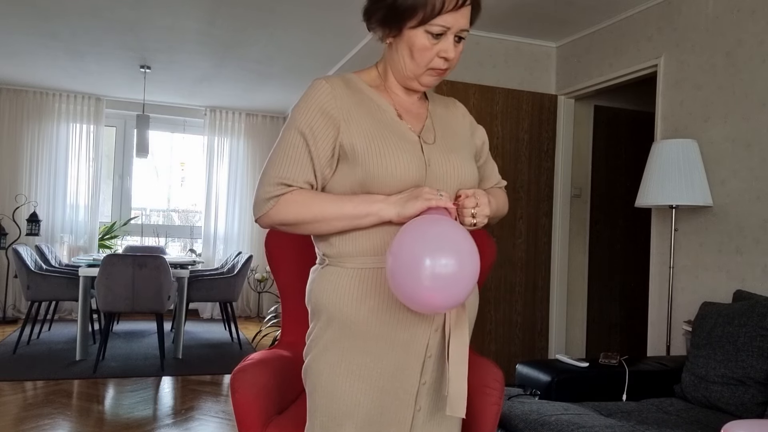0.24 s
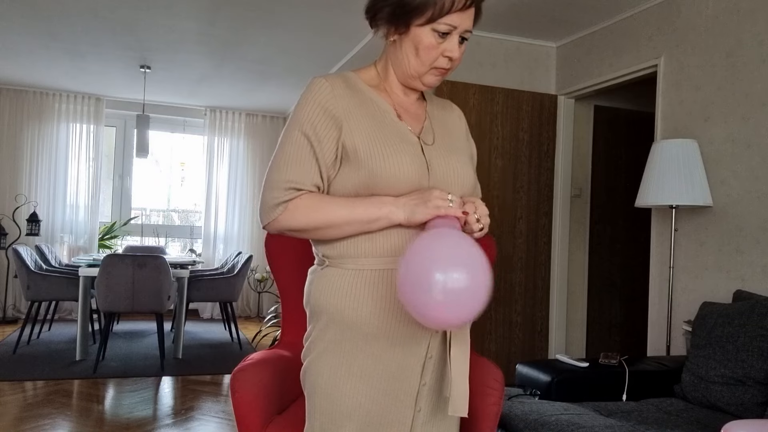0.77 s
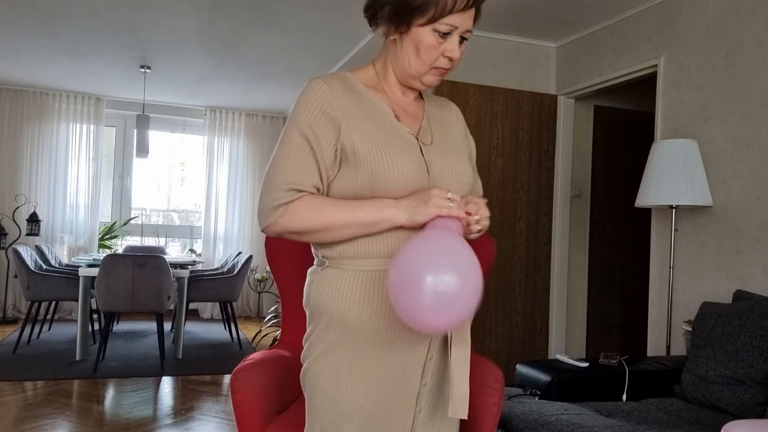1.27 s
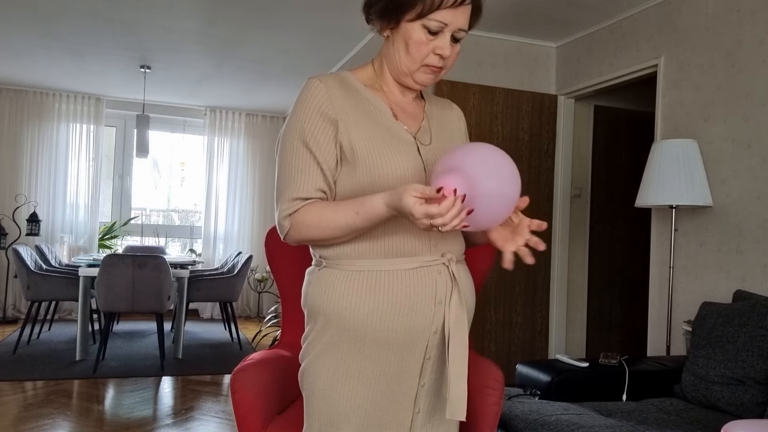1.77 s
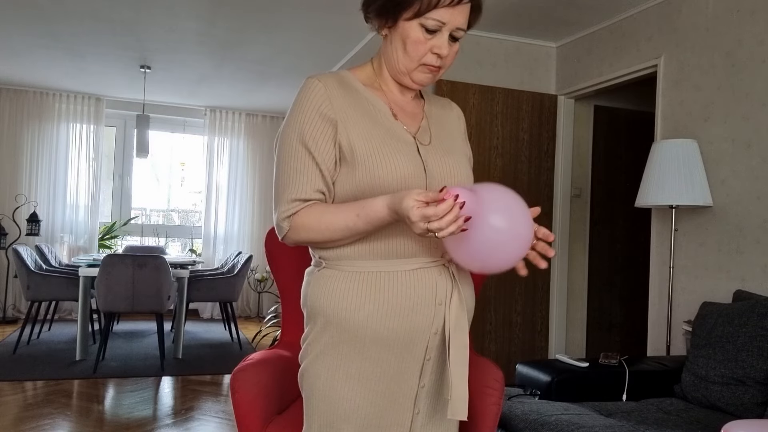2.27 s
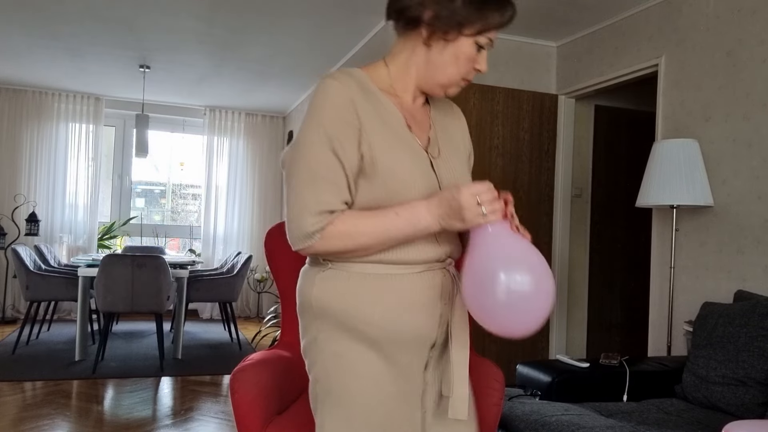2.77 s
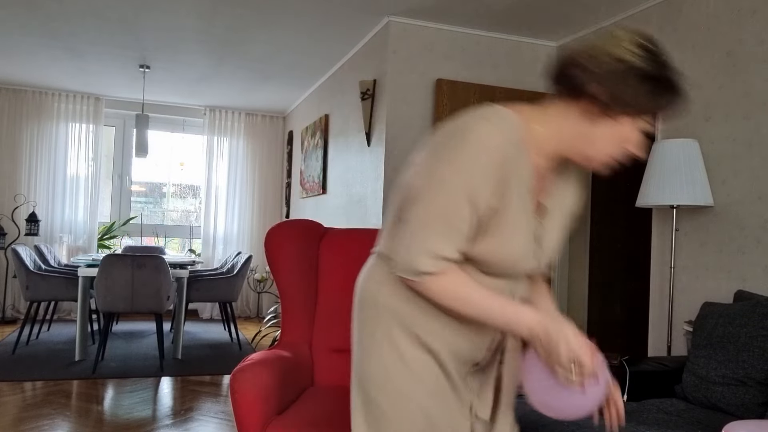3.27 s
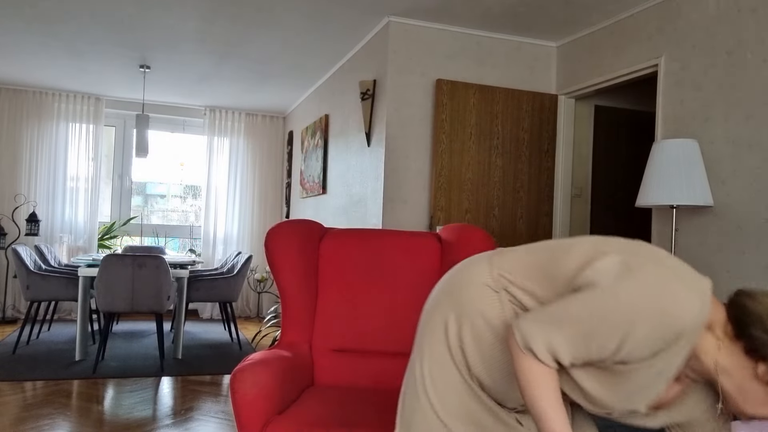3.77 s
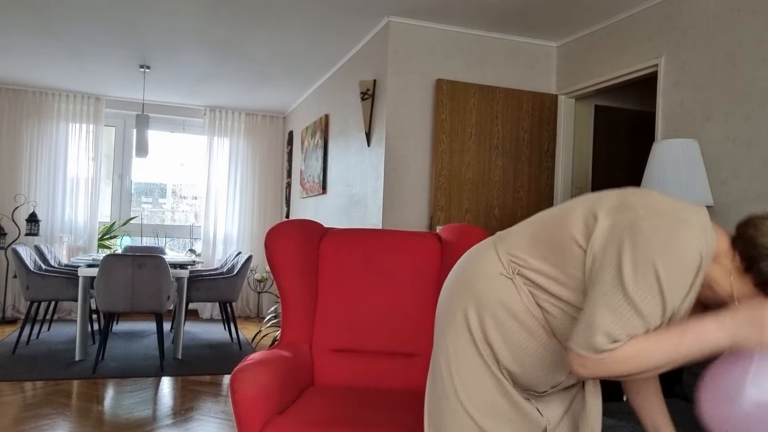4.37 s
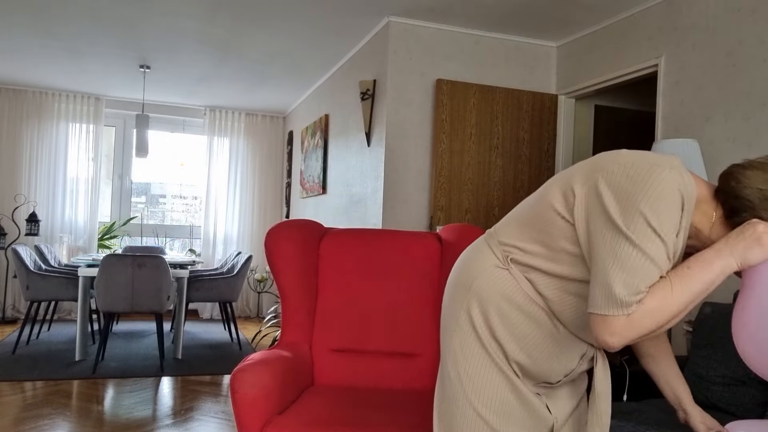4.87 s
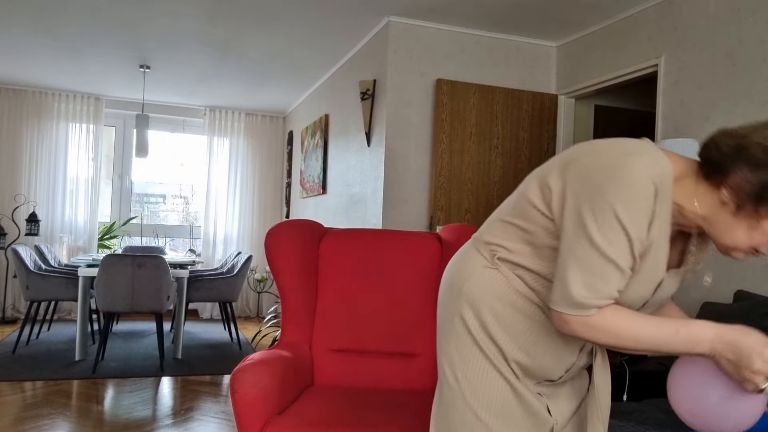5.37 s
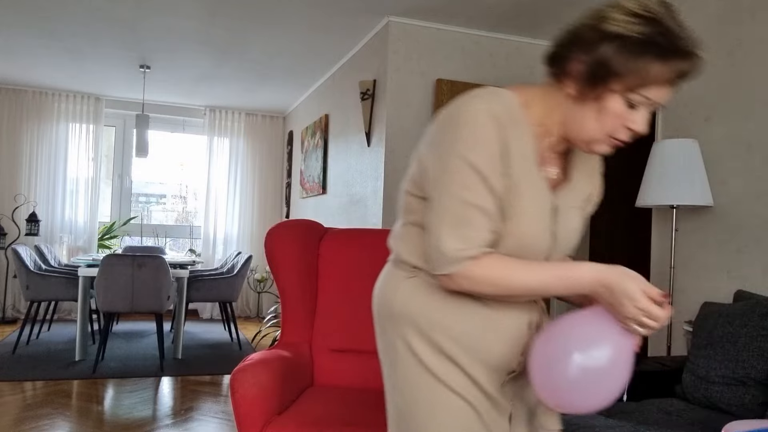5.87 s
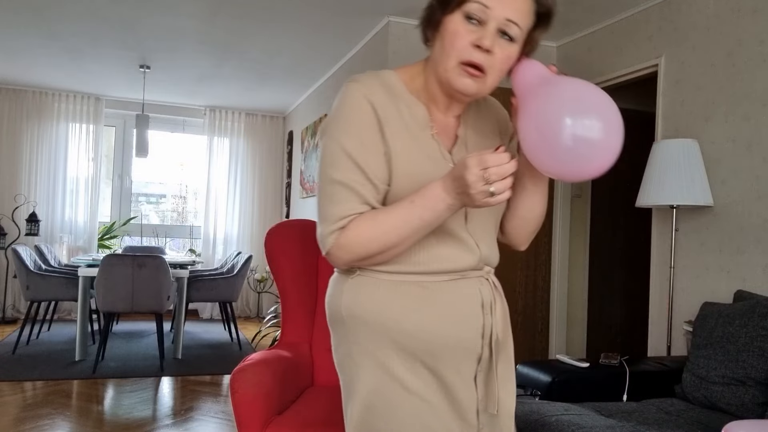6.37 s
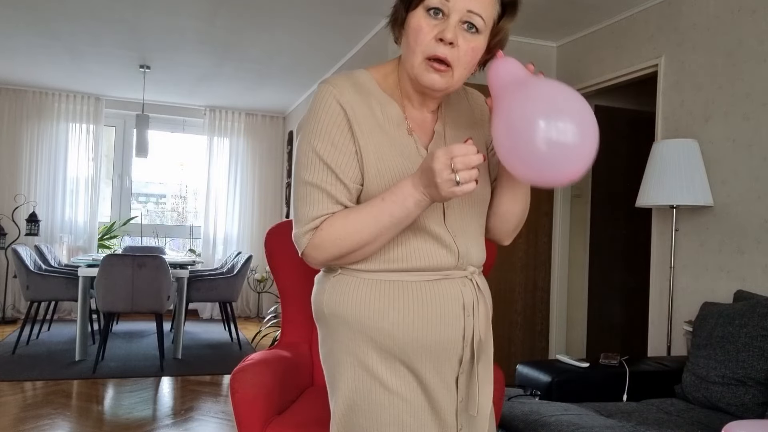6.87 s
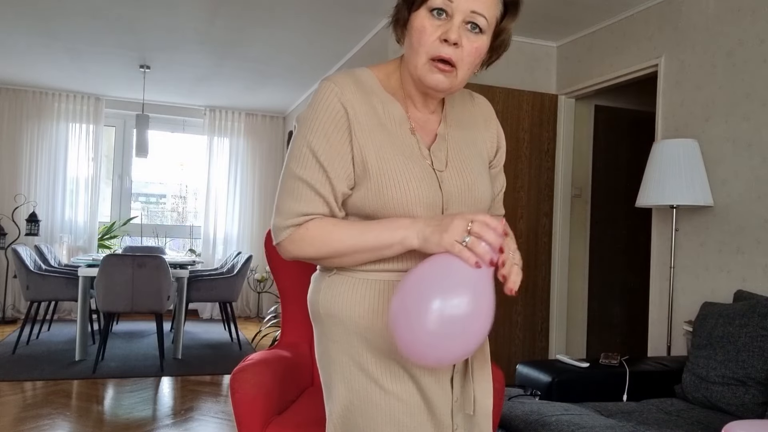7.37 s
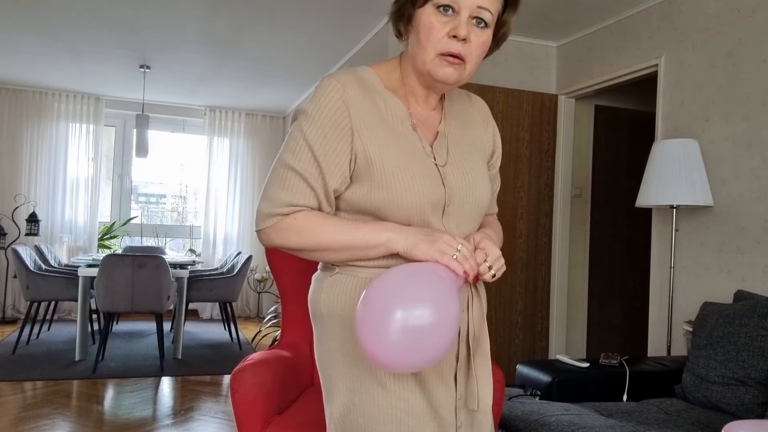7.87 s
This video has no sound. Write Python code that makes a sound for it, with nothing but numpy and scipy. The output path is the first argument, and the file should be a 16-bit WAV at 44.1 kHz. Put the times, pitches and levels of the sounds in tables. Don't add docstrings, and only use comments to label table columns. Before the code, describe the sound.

Indoors, a hand pump pushes air into a balloon about once a second. Each half-second stroke is a bright, turbulent hiss topped by a thin, fluttering, extremely high whistle, ending in a low piston knock. Soft puffs of intake air slide upward between strokes. Fingers tick on rubber, and a brief squeak follows the sixth push. Close stereo microphone, small furnished room, faint background hiss.

```python
import sys
import numpy as np
from scipy import signal
from scipy.fft import rfft, irfft, next_fast_len
from scipy.io import wavfile
from scipy.ndimage import uniform_filter1d, map_coordinates

SR = 44100
rng = np.random.default_rng(int(sys.argv[2]) if len(sys.argv) > 2 else 0)


def voltage_ratio(level):
    return 10 ** (np.asarray(level, float) / 20)


def inscribe(sig):
    pcm = np.round(np.clip(np.atleast_2d(sig).T, -1, 1) * 32767)
    wavfile.write(sys.argv[1], SR, pcm.astype(np.int16))


N = 358533
T = np.arange(N) / SR
SIZE = next_fast_len(N + SR)
HZ = np.maximum(np.arange(SIZE // 2 + 1) * SR / SIZE, 1)

# start_s, length_s, hiss_db, middle_share_db, bright_share_db
PUSHES = [
    (-.1, 0.33, -32, -1, -4.5),
    (0.836, 0.49, -30, -1, -2.5),
    (1.892, 0.47, -28, -1.5, -2.5),
    (2.932, 0.5, -27.5, -3, -1),
    (3.963, 0.47, -27, -1.5, -0.5),
    (5.025, 0.51, -28, -2.5, 1.5),
    (6.081, 0.44, -27.5, -1, 2),
    (7.063, 0.48, -28, 0.5, 5.5),
    (8.084, 0.29, -33.5, 4, 12),
]
# start_s, length_s, first_hz, last_hz, level_db
RETURNS = [
    (0.408, 0.23, 230, 380, -61.5),
    (1.488, 0.23, 237.7, 420, -62.5),
    (2.501, 0.26, 231.7, 444, -57.5),
    (3.55, 0.26, 214.2, 471.4, -61),
    (4.584, 0.2, 210.8, 482, -58.5),
    (5.614, 0.3, 232.4, 465, -53.5),
    (6.639, 0.21, 212, 462, -57),
    (7.67, 0.2, 213.7, 451, -56.5),
]


def rms_one(x):
    return x / np.sqrt(np.mean(x ** 2) + 1e-20)


def in_time(rows):
    s, *columns = np.transpose(rows)
    return [np.interp(T, s, c) for c in columns]


def during(rows, fade=.012):
    return np.clip(np.minimum(T - rows[0][0] + 0.0048, rows[-1][0] + 0.0011 - T) / fade, 0, 1)


def nearest(rows):
    rows = np.array(rows)
    halfway = (rows[1:, 0] + rows[:-1, 0] + rows[:-1, 1]) / 2
    s, length, *rest = rows[np.searchsorted(halfway, T)].T
    return T - s, s + length - T, np.clip((T - s) / length, 0, 1), *rest


def at_hz(points, hz):
    freqs, levels = np.array(points).T[:2]
    return np.interp(np.log(hz), np.log(freqs), levels)


def colour(x, gain):
    return irfft(rfft(x, SIZE) * gain, SIZE)[..., :N]


def drift(rate):
    r = np.exp(-16 * np.pi * rate / SR)
    slow = signal.lfilter([1], [1, -2 * r, r * r], rng.standard_normal(N // 8 + 6002))[6000:]
    return np.interp(np.arange(N) / 8, np.arange(len(slow)), rms_one(slow - slow.mean()))


def ring(clicks, hz, t60):
    r, w = voltage_ratio(-60 / (t60 * SR)), 2 * np.pi * hz / SR
    return signal.lfilter([0, np.sin(w)], [1, -2 * r * np.cos(w), r * r], clicks + 1e-18)


def strikes(times, sizes):
    out = np.zeros(N)
    out[(np.asarray(times) * SR).astype(int)] = sizes
    return out


def tone(hz, level, wobble_hz, rate, breath):
    phase = 2 * np.pi * np.cumsum(hz + wobble_hz * drift(rate)) / SR
    in_phase = 1 + breath * np.clip(drift(45), -2, 1)
    quadrature = breath * np.clip(drift(45), -1.5, 1.5)
    return level * (in_phase * np.sin(phase) + quadrature * np.cos(phase))


def diffuse(size):
    alike_below_hz = 1250
    common, own = rng.standard_normal(size), rng.standard_normal((2, size))
    low_pass = signal.butter(2, alike_below_hz, fs=SR, output="sos")
    return own + .8 * signal.sosfilt(low_pass, common - own)


def room_tail():
    # freq_hz, t60_s
    decay_times = [(100, .5), (1000, .45), (5000, .34), (15000, .2)]
    t, noise, tail = np.arange(SR // 2) / SR, rfft(diffuse(SR // 2)), 0
    octave = np.floor(np.log2(np.arange(1, SR // 4 + 2) / 20))
    for k in range(10):
        tail = tail + irfft(noise * (octave == k)) * voltage_ratio(-60 * t / at_hz(decay_times, 56 * 2 ** k))
    tail = tail * np.clip((t - .003) / 0.0015, 0, 1)
    return rfft(tail / np.sqrt(np.sum(tail ** 2) / 2), SIZE)


def room(x, tail, wet_db, pan_db, lag=14):
    left = colour(x, np.exp(-2j * np.pi * HZ * lag / SR)) * voltage_ratio(pan_db / 2)
    direct = np.array([left, x * voltage_ratio(-pan_db / 2)])
    return direct + voltage_ratio(wet_db) * colour(x, tail)


def room_tone():
    # freq_hz, level_db (per Hz)
    hush_spectrum = [(15, -28), (30, -3), (62, 9), (95, -5.5), (240, -5.5), (340, 0.5), (900, -6),
                     (1500, -7), (2100, -3), (3200, 6.5), (5600, 2), (11000, 3.5), (12400, 7), (15900, 8)]
    # time_s, level_db
    mic_hiss = [
        (0, -2.5),
        (.7, 1.5),
        (1.75, -11.5),
        (2.85, -5),
        (3.8, -3),
        (4.85, -0.5),
        (5.95, -1),
        (6.75, 4),
        (7.85, -1.5),
    ]
    lull_hz = [900, 5460]
    hush = voltage_ratio(-41) * rms_one(colour(diffuse(N), voltage_ratio(at_hz(hush_spectrum, HZ)) * (HZ > 15)))
    treble = colour(hush, 1 / (1 + (4400 / HZ) ** 4))
    middle = colour(hush, 1 / (1 + (lull_hz[0] / HZ) ** 4) / (1 + (HZ / lull_hz[1]) ** 4))
    lull_depth_db, lull_before_s, lull_s = -11.5, 0.12, 0.073
    lull_db = sum(lull_depth_db * np.exp(-((T - row[0] + lull_before_s) / lull_s) ** 2) for row in PUSHES)
    return hush + (voltage_ratio(in_time(mic_hiss)[0]) - 1) * treble + (voltage_ratio(lull_db) - 1) * middle


def jet_noise(patchy_db=2.8):
    # freq_hz, level_db (per Hz)
    jet_spectrum = [(600, -34), (1000, -24), (1450, -20), (1700, -11), (2200, -10), (2700, -11), (3700, -7),
                    (5400, 0), (7500, -4), (8800, -9), (11000, -10.5), (13000, -10), (14500, -7),
                    (15600, -11)]
    # freq_hz, width_hz, level_db
    barrel = [(1500, 300, -9), (1950, 300, 3), (2260, 55, 6), (2420, 120, -2), (2790, 130, -18),
              (3040, 120, 7), (3510, 60, 4), (3750, 110, -3), (4130, 70, 6), (4300, 60, 4), (4450, 110, -5),
              (4800, 200, 2), (5450, 600, 4), (6240, 60, 3), (6570, 80, 4), (6930, 60, 2), (7400, 300, 3),
              (9200, 200, -5), (11270, 1100, -2.5), (12300, 500, -2.5)]
    barrel_db = sum(db / (1 + (2 * (HZ - hz) / width) ** 2) for hz, width, db in barrel)
    jet = rfft(rng.standard_normal(SIZE)) * voltage_ratio(at_hz(jet_spectrum, HZ) + barrel_db)
    together = drift(75)
    parts = np.zeros((5, N))
    for hz in 700 * 2 ** np.arange(0, 4.7, 1 / 7):
        window = np.cos(np.pi / 2 * np.clip(7 * np.log2(HZ / hz), -1, 1)) ** 2
        band = irfft(jet * window, SIZE)[:N]
        part = np.searchsorted([2600, 4700, 6200, 9500], hz)
        parts[part] += band * voltage_ratio(patchy_db * (.5 * together + .8 * drift(7)))
    return map(rms_one, parts)


def hiss():
    # low_db, middle_db, bright_db, top_db
    push_shares = [-13, 2, -1, -1]
    # low_db, middle_db, bright_db, top_db
    intake_shares = [-9, -3.5, -6.5, -8]
    puffs = [-46, -48, -44, -46, -49.5, -68, -51.5, -54]
    low, middle, body, bright, top = jet_noise()

    since, left, way, push_db, fuller_db, brighter_db = nearest(PUSHES)
    out_db = push_db + 3 * (np.sin(np.pi * way) - 1)
    out_db -= 234 * np.maximum(0.031 - since, 0)
    out_db -= 171 * np.maximum(0.043 - left, 0)
    low_db, middle_db, bright_db, top_db = push_shares
    middle_db = middle_db + fuller_db - 0.8555 * T - 2 * way
    bright_db = bright_db + brighter_db - 0.93 * (T - T.mean())
    out = body + voltage_ratio(low_db) * low + voltage_ratio(middle_db) * middle
    out += voltage_ratio(bright_db) * bright + voltage_ratio(top_db) * top

    peak_s, fall_db_per_s2 = 0.1, 904
    in_gain = sum(voltage_ratio(db - fall_db_per_s2 * (T - row[0] - peak_s) ** 2) for row, db in zip(RETURNS, puffs))
    drawn = body + sum(voltage_ratio(db) * part for db, part in zip(intake_shares, (low, middle, bright, top)))
    inlet_hz, inlet_width_hz, inlet_db = 5410, 590, 6.5
    drawn = colour(drawn, voltage_ratio(inlet_db / (1 + (2 * (HZ - inlet_hz) / inlet_width_hz) ** 2)))

    air = voltage_ratio(-9.5) * (voltage_ratio(out_db) * out + in_gain * drawn)
    late = np.arange(N) - SR * (.0022 + .0004 * drift(.5))
    return air + .45 * map_coordinates(air, [late], order=3)


def whistle():
    # time_s, level_db
    full_pushes = [
        [(0.9, -51), (0.942, -31), (1.004, -28), (1.01, -26), (1.146, -27), (1.154, -18), (1.206, -14.5),
         (1.31, -31.5), (1.33, -49)],
        [(1.9, -36), (1.932, -19.5), (1.958, -23), (1.974, -17), (2.118, -27.5), (2.232, -16.5), (2.244, -30),
         (2.292, -19), (2.4, -36)],
        [(2.93, -41), (3.008, -18), (3.186, -28), (3.208, -19), (3.244, -36), (3.334, -17.5), (3.366, -28),
         (3.392, -17), (3.45, -40)],
        [(3.97, -35), (3.988, -34), (4.006, -13), (4.176, -31), (4.256, -27), (4.264, -30), (4.33, -31),
         (4.392, -14.5), (4.46, -47)],
        [(5.02, -48), (5.06, -22), (5.114, -28), (5.12, -22.5), (5.28, -28), (5.294, -22), (5.338, -31),
         (5.494, -18), (5.54, -36)],
        [(6.09, -40), (6.114, -27), (6.182, -18), (6.188, -28), (6.272, -21), (6.296, -39), (6.37, -20.5),
         (6.518, -25), (6.54, -37)],
        [(7.07, -48), (7.1, -13.5), (7.124, -31), (7.136, -16), (7.266, -44), (7.284, -25.5), (7.424, -28),
         (7.48, -13.5), (7.57, -42)],
    ]
    # time_s, level_db
    end_pushes = [
        [(0.0, -38), (0.144, -32), (0.224, -41), (0.23, -49)],
        [(8.08, -51), (8.104, -42), (8.114, -22.5), (8.125, -22)],
    ]
    # time_s, pitch_hz
    pitches = [
        [(0, 14740), (.12, 14800), (.23, 14740)],
        [(.9, 14730), (.978, 14936), (1.144, 15070), (1.24, 15030), (1.33, 14800)],
        [(1.9, 14700), (1.986, 15170), (2.074, 15360), (2.2, 15170), (2.3, 15090), (2.4, 14600)],
        [(2.94, 14600), (3.008, 15073), (3.126, 15386), (3.25, 15330), (3.34, 15130), (3.45, 14520)],
        [(3.97, 14540), (4.002, 14918), (4.116, 15428), (4.22, 15470), (4.312, 15361), (4.41, 14811),
         (4.46, 14420)],
        [(5.03, 14650), (5.062, 14928), (5.164, 15265), (5.3, 15310), (5.434, 15262), (5.54, 14620)],
        [(6.09, 14750), (6.154, 15107), (6.316, 15372), (6.476, 15080), (6.54, 14550)],
        [(7.07, 14750), (7.18, 15347), (7.29, 15420), (7.396, 15386), (7.57, 14700)],
        [(8.09, 14560), (8.125, 14895)],
    ]
    # time_s, peak_db
    surges = [(0.0732, -18.5), (0.1181, -19.5), (0.9358, -16), (1.0086, -10), (1.0844, -26), (1.1528, -8.5),
              (1.9086, -21), (1.9744, -7), (2.0298, -13.5), (2.0986, -17), (2.1969, -10), (2.3381, -23.5),
              (2.9666, -13.5), (3.011, -12), (3.2863, -22), (3.3746, -14.5), (4.0012, -5), (4.0301, -8),
              (4.0701, -1), (4.1773, -26), (4.2257, -16), (4.2916, -19), (4.3579, -6.5), (4.4711, -32),
              (5.0528, -10), (5.1207, -14), (5.1681, -19), (5.2893, -16), (5.3526, -26), (5.3955, -11),
              (5.4429, -11), (5.4709, -16), (6.1109, -16), (6.1339, -12), (6.2406, -11), (6.3214, -26),
              (6.3584, -13.5), (6.4013, -14), (6.4322, -22), (6.4811, -17), (6.8732, -34), (7.0942, -9.5),
              (7.1331, -11), (7.2369, -23), (7.2713, -23), (7.3815, -15), (7.4349, -16), (8.1139, -17)]
    pushes = end_pushes[:1] + full_pushes + end_pushes[1:]
    (hz,), (level_db,) = in_time(sum(pitches, [])), in_time(sum(pushes, []))
    halo = 1 + .11 * drift(500)
    hz = uniform_filter1d(hz, size=1300)
    level_db = level_db + 3.5
    catch_s, break_db, break_s, sag_db_per_s, top_db = 0.002, -10, 0.0022, 296, -10
    for s, db in surges:
        near = slice(int((s - .03) * SR), int((s + .1) * SR))
        t = T[near] - s + 0.0056
        surge_db = min(db, top_db) - 3.5 - sag_db_per_s * np.maximum(t - 2.9 * catch_s, 0)
        surge_db = surge_db - 30 * np.exp(-np.maximum(t, 0) / catch_s)
        broken_db = level_db[near] + break_db * np.exp(-((t + 0.0032) / break_s) ** 2)
        level_db[near] = np.maximum(broken_db, np.where(t > 0, surge_db, -99))
    level = sum(map(during, pushes)) * voltage_ratio(level_db)
    return halo * tone(hz, level, wobble_hz=16.7, rate=30.5, breath=0.45)


def valve():
    # time_s, pitch_hz, level_db
    chirps = [
        [(0, 570, -56.5), (.12, 548, -60), (.2, 497, -63), (.28, 470, -72)],
        [(1.97, 1380, -53), (2.06, 1150, -51.5), (2.13, 1030, -58), (2.22, 1000, -86)],
        [(3.03, 1297, -54), (3.12, 1117, -60), (3.22, 1010, -66)],
        [(4.15, 1060, -52), (4.2, 1020, -52), (4.3, 990, -77)],
        [(6.14, 1370, -56), (6.23, 1150, -51.5), (6.29, 1020, -42.5), (6.33, 985, -64), (6.42, 950, -75)],
        [(7.14, 1370, -49), (7.25, 1150, -60), (7.33, 1000, -72), (7.42, 900, -58)],
    ]
    # time_s, pitch_hz, level_db
    reeds = [
        [(0, 2086, -32), (.08, 2050, -53), (.17, 2040, -62)],
        [(.84, 3570, -56), (.92, 3530, -34.5), (1.0, 3270, -66)],
        [(.85, 5410, -54), (.93, 5300, -34), (1.0, 5240, -56)],
    ]
    # time_s, peak_db, pitch_hz
    pops = [
        (2.844, -66, 876),
        (3.869, -61.5, 748),
        (4.927, -59.5, 858),
        (5.979, -65, 606),
        (6.968, -61, 876),
        (7.981, -58.5, 693),
    ]
    hz, level_db = in_time(sum(chirps, []))
    level = sum(map(during, chirps)) * voltage_ratio(level_db + 3.5)
    out = tone(hz, level, wobble_hz=6.0, rate=40, breath=.12)
    for rows in reeds:
        hz, level_db = in_time(rows)
        out += tone(hz, during(rows) * voltage_ratio(level_db), wobble_hz=35.0, rate=74, breath=1.0)
    for s, db, hz in pops:
        out += ring(ring(strikes([s], voltage_ratio(db - 13.5)), hz, 0.025), hz, 0.028)
    return out


def thuds():
    # time_s, peak_db, mid_share_db (170-320 Hz), high_share_db (above 320 Hz)
    blow_table = [(0.178, -34.5, 0, -12), (0.714, -45.5, -14.5, -28), (1.012, -77, -21, -22.5),
                  (1.784, -43, -9, -42), (2.04, -64, -4, 3), (2.306, -33, 1, -13.5), (2.767, -33, -6, -36),
                  (2.869, -44.5, -23, -40), (3.853, -41, -12.5, -38), (4.907, -44, -12, -40),
                  (5.502, -47, -22, -21), (5.971, -46.5, -12, -25), (6.468, -40, 0, -14),
                  (6.904, -48, -23, -41), (7.27, -54, -18, -11), (7.977, -50, 2, -35)]
    # freq_hz, level_db, t60_s
    boards = [(67.5, -10.5, 0.33), (90, -11, 0.14), (109.5, -7, 0.12), (137.4, -4.5, 0.3),
              (160, -2.5, 0.093), (211, 3.5, 0.1), (277, 2, 0.067), (344.3, 12, 0.076), (425.6, 4, 0.1),
              (520, -1, 0.08), (629, -3, 0.042)]
    s, peak_db, mid_db, high_db = np.transpose(blow_table)
    chance, out = rng.normal(0, 1, (len(s), len(boards))), np.zeros(N)
    late = rng.random((len(s), len(boards)))
    for k, (hz, db, t60) in enumerate(boards):
        share_db = high_db if hz > 320 else mid_db if hz > 170 else 0
        arrives = s + .08 * max(hz - 200, 0) / 1000 + 0.00986 * late[::-1, k]
        blows = strikes(arrives, (-1) ** k * voltage_ratio(peak_db + db + share_db + 3.5 * chance[:, k]))
        rebound = 0.41 * np.tanh(chance[::-1, k]) * blows[blows != 0]
        blows += strikes(arrives + 0.00952 + 0.0229 * late[:, k], rebound)
        out += ring(ring(blows, hz, 0.017) * 22.7 / (.06 * SR) * 2, hz, t60)
    return signal.sosfilt(signal.butter(2, 48, "high", fs=SR, output="sos"), out)


def stops():
    # time_s, level_db
    ends = [
        (.31, -39),
        (1.375, -36.5),
        (2.417, -36.5),
        (3.457, -37.5),
        (4.481, -37),
        (5.558, -36.5),
        (6.552, -37),
        (7.566, -38),
    ]
    # freq_hz, level_db, t60_s
    knock = [(70, -3, 0.23), (93, 5, 0.054), (292, -9.5, 0.077), (406, -4, 0.086), (631, -9.5, 0.092)]
    # after_s, level_db
    boom = [(0, -41), (.012, -1.5), (.035, -2.5), (.06, -3), (.076, -31), (.095, -11), (.15, -23.5),
            (.18, -27), (.3, -57)]
    s, db = np.transpose(ends)
    chance, out = rng.normal(0, 1, (len(s), len(knock))), np.zeros(N)
    for k, (hz, mode_db, t60) in enumerate(knock):
        blows = strikes(s, (-1) ** (k + 1) * voltage_ratio(db + mode_db + 0.91 * chance[:, k]))
        out += ring(ring(blows, hz, 0.015) * 330 * 2 / SR, hz, t60)
    after, boom_db = np.transpose(boom)
    for at, level_db in ends:
        level = voltage_ratio(level_db + np.interp(T - at, after, boom_db, -99, -99))
        out += level * np.sin(2 * np.pi * 138.4 * (T - at) + 0.91)
    return out


def ticks():
    # time_s, peak_db, ring_hz, top_share_db, low_share_db
    taps = [(0.368, -56, 2960, -3, 1.5), (0.712, -54, 2100, -14, 1), (1.099, -50.5, 4280, -12, -1),
            (1.782, -60.5, 2600, -8, 0), (2.644, -51.5, 2780, -9, -8), (2.724, -48, 3600, 3.5, -44),
            (2.731, -55, 2790, -3, -30), (3.008, -52.5, 3470, -7, 3), (6.778, -57, 2600, 1, 4),
            (6.863, -54, 3090, -6, -30), (6.869, -53.5, 3000, -7, -32), (6.873, -49, 3080, 7, -30)]
    out, t = np.zeros(N), np.arange(2000) / SR
    crackle = rng.standard_normal((len(taps), 2000)) * np.exp(-t / .005) * np.minimum(t / .004, 1)
    for (s, db, hz, top_db, low_db), burst in zip(taps, crackle):
        snap = 0.48 * ring(burst, hz, 0.0052) - 0.11 * ring(burst, 0.65 * hz, 0.0029)
        snap += 0.25 * ring(burst, 5000, 0.0076)
        snap += voltage_ratio(top_db) * np.diff(burst, prepend=0)
        snap += 0.21 * voltage_ratio(low_db) * (ring(burst, 1302, 0.0061) - ring(burst, 855, 0.0044))
        out[int(s * SR):int(s * SR) + 2000] += voltage_ratio(db + 18.5) * snap
    return out


def intake():
    rows = np.array(RETURNS)
    latest = np.clip(np.searchsorted(rows[:, 0], T) - 1, 0, None)
    s, length, first_hz, last_hz, db = rows[latest].T
    way = np.clip((T - s) / length, 0, 1)
    phase = 2 * np.pi * np.cumsum(first_hz * (last_hz / first_hz) ** way) / SR
    first_mode = (0.71 + 0.57 * drift(30)) * np.sin(phase)
    third_mode = 0.8 * (0.83 + np.tanh(drift(28))) * np.sin(2.4 * phase)
    return voltage_ratio(db) * np.sin(np.pi * way) * (first_mode + third_mode)


def squeak():
    # time_s, slip_rate_hz, level_db, roughness (0-1)
    grips = [
        [(5.652, 2085, -52, .03), (5.672, 2075, -33, .03), (5.688, 2060, -28, .05), (5.696, 1985, -31, .08),
         (5.716, 1960, -38, .15)],
        [(5.68, 1670, -26, .15), (5.688, 1640, -34, .3), (5.698, 1620, -29, .2), (5.708, 1590, -36, .4)],
        [(5.69, 1250, -40, .3), (5.71, 1000, -36, .3), (5.735, 900, -32, .3), (5.77, 800, -40, .6)],
        [(5.705, 1345, -38, .15), (5.732, 1340, -28, .12), (5.75, 1320, -34, .3), (5.775, 1280, -42, .5)],
        [(5.71, 680, -37, .12), (5.727, 677, -31, .12), (5.745, 668, -36, .4), (5.8, 620, -47, .8)],
        [(5.79, 1345, -45, .5), (5.825, 1320, -35, .4), (5.85, 1270, -42, .6), (5.9, 1200, -58, .8)],
    ]
    # freq_hz, level_db (per Hz)
    skin = [(250, -23), (650, -14.5), (950, -13.5), (1500, -16.5), (2000, -9.5), (2650, -10.5),
            (3300, -14.5), (4000, -9), (4900, -2), (6200, -13), (8200, -16), (9300, -30), (10300, -23),
            (14000, -19)]
    rub, jitter, noise = np.zeros(N), drift(292), rng.standard_normal(N)
    for rows in grips:
        span = slice(int(rows[0][0] * SR) - 200, int(rows[-1][0] * SR) + 200)
        per_s, level_db, rough = (curve[span] for curve in in_time(rows))
        turns = np.cumsum(per_s * (1 + .14 * rough * jitter[span])) / SR
        harmonics = range(1, int(13000 / rows[0][1]))
        slips = sum(np.cos(2 * np.pi * k * turns + .3 * k * k) for k in harmonics)
        grip = (rms_one(slips) + 1.8 * rough * noise[span]) / np.hypot(1, 1.8 * rough)
        rub[span] += during(rows, fade=0.0027)[span] * voltage_ratio(level_db) * grip
    return colour(rub * voltage_ratio(2.6 * drift(81) + 11.5), voltage_ratio(at_hz(skin, HZ)))


def scene():
    tail = room_tail()
    out = room(valve() + intake(), tail, wet_db=-5.5, pan_db=-4.0)
    out += room(ticks() + squeak(), tail, wet_db=-6.0, pan_db=-2.5)
    out += room(hiss(), tail, wet_db=2.0, pan_db=-3.0)
    out += room(whistle(), tail, wet_db=-3.0, pan_db=-6.0 + 2.8 * drift(21), lag=13.93)
    out += room(stops(), tail, wet_db=-7.0, pan_db=-2.2)
    return out + room(thuds(), tail, wet_db=-3.5, pan_db=-1.0) + room_tone()


def roll_off(x):
    return signal.sosfilt(signal.butter(12, 17100, fs=SR, output="sos"), x)


def record(dry):
    cut = colour(dry, np.clip((15850 - HZ) / 100, 0, 1))
    return roll_off(cut)


dry = scene()
out = record(dry)
inscribe(out)
```